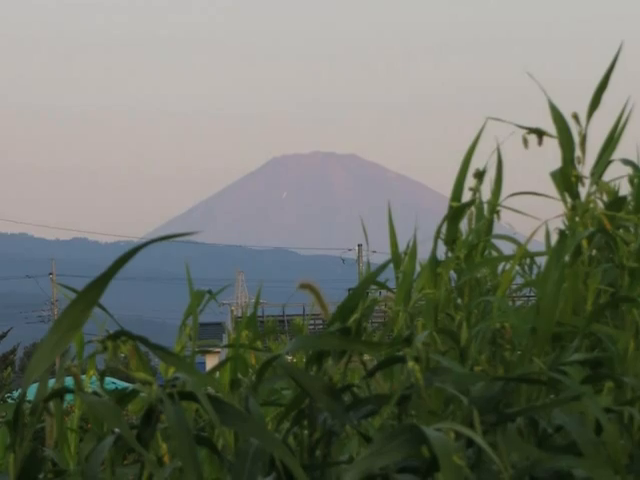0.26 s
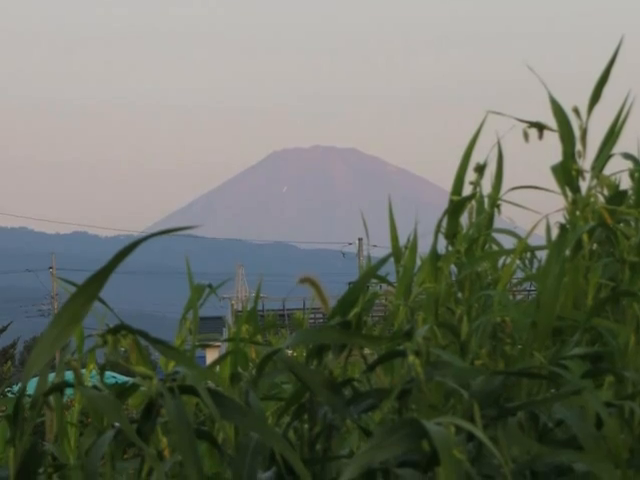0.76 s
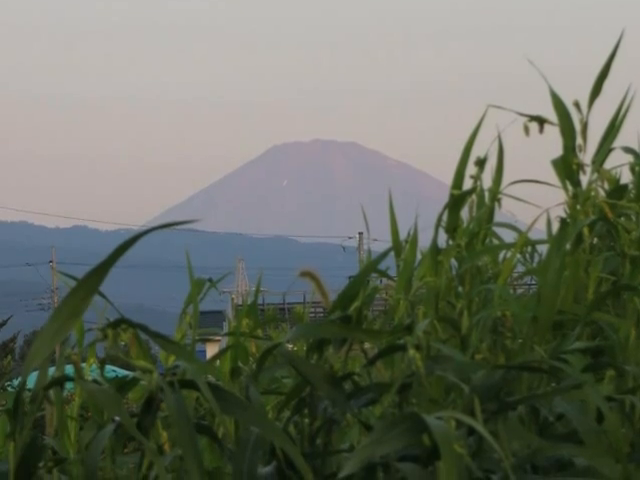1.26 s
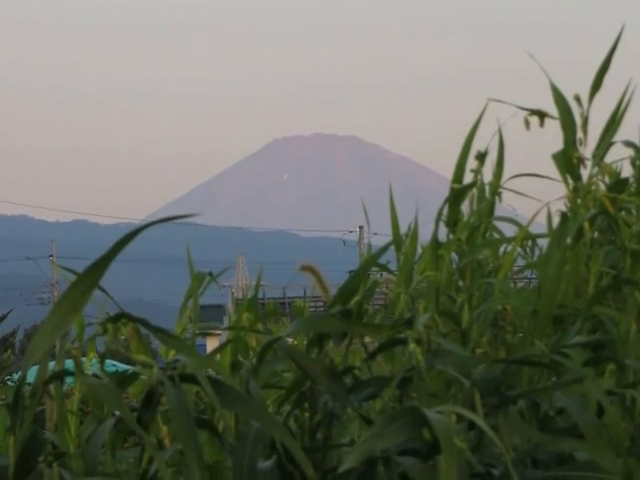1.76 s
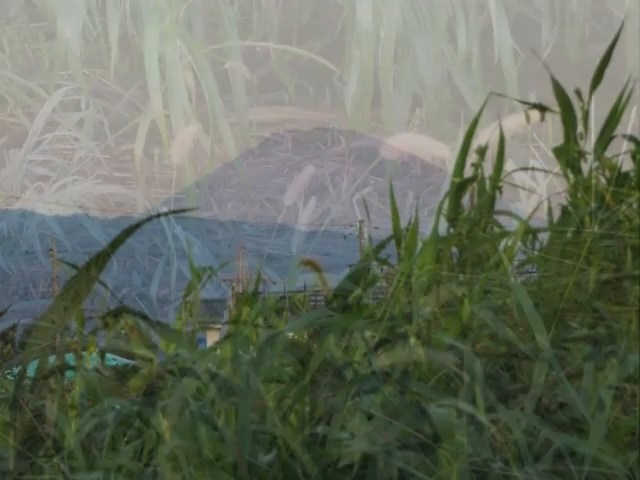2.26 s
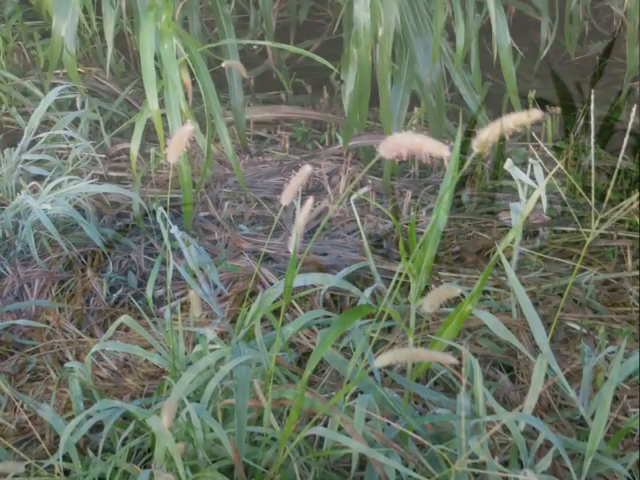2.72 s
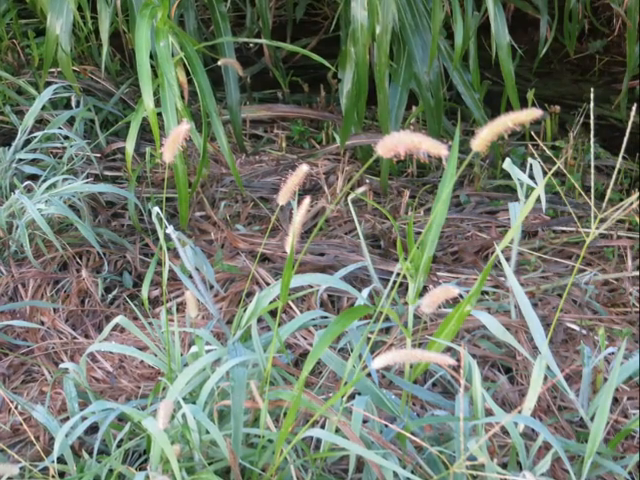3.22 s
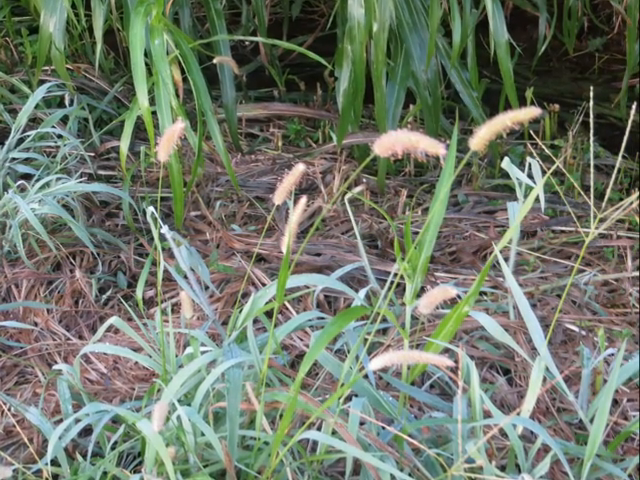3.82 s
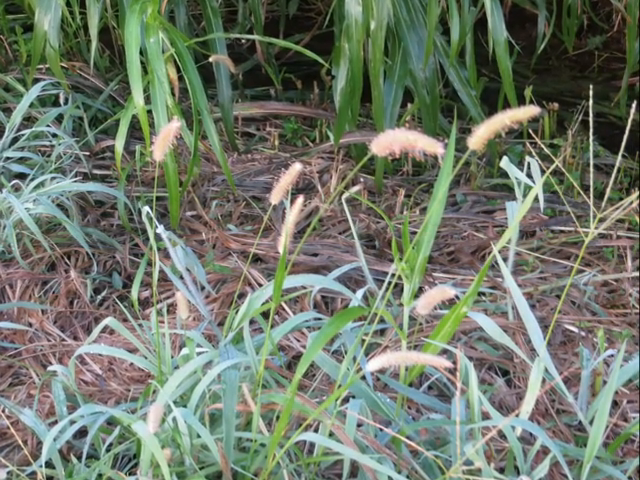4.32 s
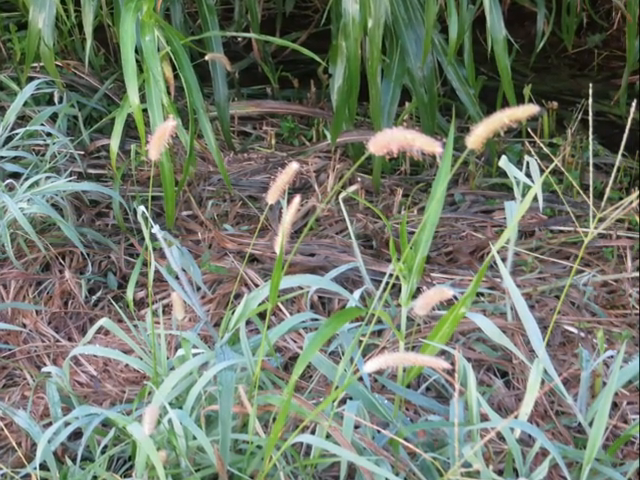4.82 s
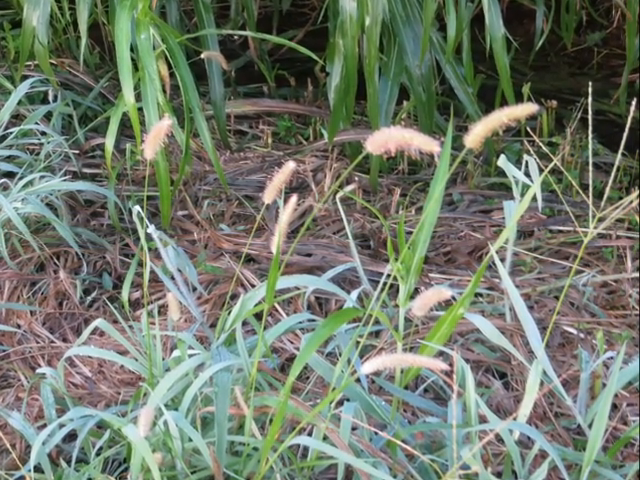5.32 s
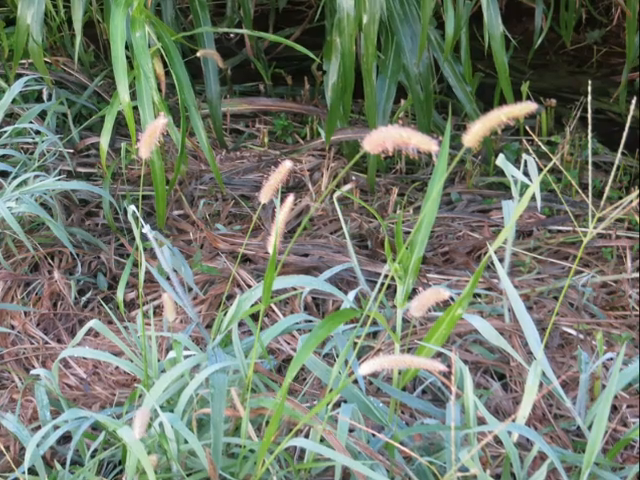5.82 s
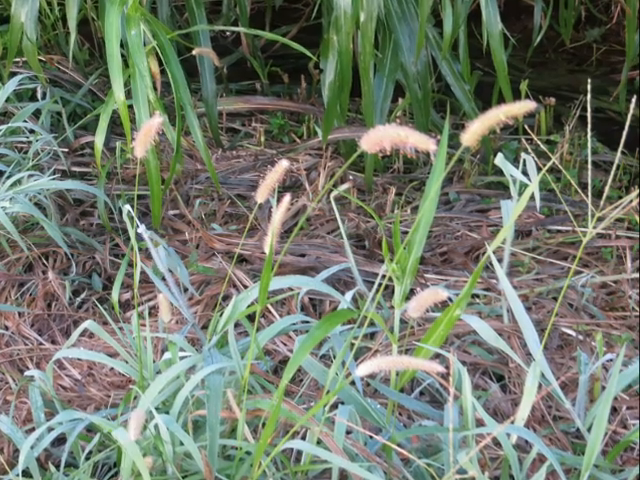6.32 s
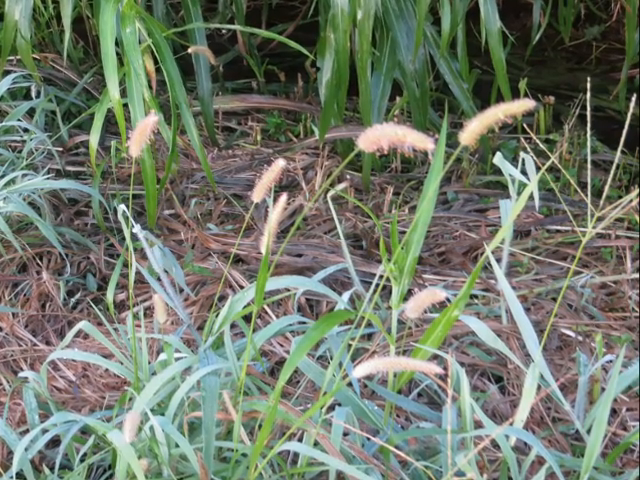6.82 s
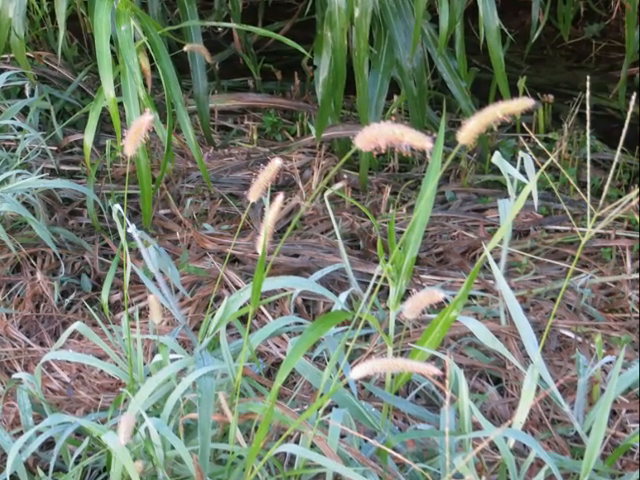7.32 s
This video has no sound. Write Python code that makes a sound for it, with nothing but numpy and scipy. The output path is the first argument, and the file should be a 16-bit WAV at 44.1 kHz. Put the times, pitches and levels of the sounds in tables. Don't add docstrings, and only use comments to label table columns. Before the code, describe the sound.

A dense field of crickets chirps and trills in two overlapping pitches over a low, steady far traffic rumble and faint hiss.

```python
import sys
import numpy as np
from scipy import signal
from scipy.fft import rfft, irfft, next_fast_len
from scipy.io import wavfile
from scipy.ndimage import uniform_filter1d, map_coordinates

SR = 44100
rng = np.random.default_rng(int(sys.argv[2]) if len(sys.argv) > 2 else 0)


def dump(signal):
    limited = np.clip(np.atleast_2d(signal).T, -1, 1)
    pcm = np.round(limited * 32767).astype(np.int16)
    wavfile.write(sys.argv[1], SR, pcm)


def invert_db(level):
    return 10 ** (np.asarray(level, dtype=float) / 20)


N = 333837

# first chirp in seconds, last chirp in seconds,
# peak level in dB.
BRIGHT_BOUTS = [
    (.135, .135, -44),
    (1.286, 1.438, -45),
    (1.584, 2.653, -44.3),
    (3.997, 5.063, -44.2),
    (5.202, 5.202, -43),
    (5.368, 5.368, -43.5),
    (6.598, 7.517, -45),
]
QUICK_BOUTS = [(.908, .908, -42), (1.067, 1.067, -41.5), (1.198, 1.198, -42.5), (1.343, 1.343, -47),
               (1.491, 1.786, -41.5), (3.27, 3.27, -43), (3.417, 3.854, -40), (4.006, 4.006, -42.5),
               (5.301, 5.591, -41), (5.733, 6.452, -40.7), (6.824, 6.824, -49)]
DEEP_BOUTS = [(.211, .211, -48.4), (.537, .537, -46.4), (.758, .758, -47.4), (1.28, 1.28, -48),
              (1.671, 1.976, -49), (2.137, 2.302, -46.5), (2.681, 2.681, -48), (3.036, 3.036, -49),
              (3.397, 3.397, -49), (4.258, 4.38, -49), (4.594, 4.594, -49.5), (4.818, 4.955, -47.5),
              (5.117, 5.278, -46), (5.456, 5.614, -47), (6.479, 6.797, -46), (6.937, 6.937, -47),
              (7.099, 7.429, -48)]
SHARP_BOUTS = [(0, 0, -42), (.245, 0.05, -47), (.427, 0.4, -48), (.882, .882, -52), (1.151, 1.25, -43.5),
               (2.085, 2, -47), (3.954, 4, -51), (4.779, 5, -49.4), (5.358, 5.5, -50), (5.42, 5.42, -50),
               (6.467, 6.5, -42), (7.056, 7, -49.7)]
# start in seconds, peak level in dB.
SLOW_CHIRPS = [(0.071, -46.5), (0.375, -45), (0.709, -48), (0.942, -54), (1.105, -54), (1.359, -47),
               (1.491, -57), (1.797, -48), (2.029, -47), (2.868, -50.5), (3.142, -49), (3.901, -48),
               (4.109, -44.5), (4.24, -43.5), (4.381, -43.5), (4.515, -41), (5.189, -43.5), (5.372, -50.6),
               (5.52, -49), (6.223, -47), (6.37, -41), (6.507, -41), (6.651, -41.5), (6.793, -40.5),
               (7.002, -50), (7.166, -48.4), (7.33, -50)]
# time in seconds, peak level in dB.
LONE_STROKES = [(.667, -52), (.813, -39.5), (2.302, -46), (3.175, -42.5), (3.252, -49), (3.7, -42),
                (2.8, -54), (2.96, -54), (2.98, -54)]
PARTNER_ALONE_S = [0.199, .35, .5, .7, .86, 1.02, 1.94, 2.4, 2.785, 3.29, 3.43, 3.58, 3.73, 3.88, 5.63]
OVERTONE_DB = dict(bright=-27.5, quick=-24.5, slow=-21.5, others=-24)

# first stroke in seconds, last stroke in seconds,
# peak level in dB.
NEAR_TRILLS = [
    (.018, .253, -40),
    (.552, .552, -43),
    (4.352, 4.352, -44),
    (4.434, 4.587, -40),
    (4.669, 4.918, -39.5),
]
NEAR_GROUPS = [(.391, .487, -42), (.679, .78, -42), (.893, .944, -42), (1.073, 1.118, -42.6),
               (1.277, 1.327, -44), (1.473, 1.529, -44.5), (3.565, 3.565, -49), (3.888, 3.888, -46),
               (4.01, 4.054, -48.5), (4.276, 4.276, -49), (5.035, 5.084, -41.5), (5.141, 5.195, -41.6),
               (5.322, 5.372, -42), (5.493, 5.543, -41.5), (5.68, 5.727, -42.5), (5.855, 5.911, -43),
               (7.1, 7.207, -51), (7.359, 7.359, -47), (7.52, 7.52, -48)]
RIVAL_TRILLS = [
    (3.123, 3.123, -46.5),
    (3.198, 3.348, -43.5),
    (6.708, 7.005, -43),
]
FAR_TRILLS = [(.329, .402, -48.5), (.373, .373, -50), (.539, .612, -48), (1.047, 1.207, -52),
              (1.303, 1.384, -55), (1.633, 1.633, -52), (1.786, 1.935, -52.5), (2.121, 2.121, -50),
              (2.271, 2.271, -51), (2.569, 2.569, -50), (3.044, 3.044, -52), (4.322, 4.603, -47.5),
              (4.735, 4.9, -47), (5.051, 5.13, -51), (5.28, 5.28, -52), (5.4, 5.4, -53), (5.605, 5.84, -52),
              (6.012, 6.099, -52), (6.344, 6.344, -47), (6.499, 6.573, -50), (6.658, 6.887, -46.5),
              (7.046, 7.046, -49), (7.27, 7.27, -49), (7.471, 7.471, -50.5)]

# start in seconds, peak level in dB.
HIGH_LONG = [(.558, -48.5), (1.273, -49)]
HIGH_NEAR = [(2.015, -49), (2.875, -48), (3.752, -49), (4.374, -48.5), (5.396, -50.5), (6.340, -49.5),
             (7.315, -48.5)]
HIGH_FAR = [(.782, -58), (2.094, -58), (3.454, -57), (4.643, -57.5), (5.887, -58), (6.354, -59),
            (7.238, -57.5)]
BUZZER = [(4.82, -52), (5.546, -51.5), (6.938, -51.5)]
THIN = [(.049, -58), (1.576, -57), (2.965, -56.5), (4.522, -57.5), (5.970, -57), (7.422, -56)]

# pitch in Hz, spread in Hz, glide in Hz/s, stroke in seconds,
# strokes per second, rms level in dB.
CROWD = [
    (3713, 123, -12000, 0.03, 190, -58),
    (4830, 190, -80000, 0.0093, 140, -62.5),
    (6450, 150, -80000, 0.022, 250, -73.5),
    (7424, 160, -30000, 0.0068, 380, -72),
]
# time in seconds, peak level in dB, pitch in Hz, t60 in seconds.
TICKS = [
    (.305, -45, 2200, 0.022),
    (.44, -44, 2250, 0.018),
    (1.394, -40.5, 708, 0.042),
    (1.469, -39, 1420, .012),
    (3.054, -43, 523, .07),
    (3.317, -40, 2200, 0.008),
    (4.392, -42.5, 893, .06),
    (6.488, -42, 2500, .008),
]
# time in seconds, peak level in dB, pitch in Hz, length in seconds, glide in Hz/s.
BIRD = (4.277, -55, 5400, 0.1, 20000)

# time in seconds, rms level in dB.
HUM_DB = [
    (0, -57.5),
    (1.3, -59),
    (2.6, -67.5),
    (7.57, -69),
]
# time in seconds, rms level in dB.
RUMBLE_DB = [
    (0.0, -42.5),
    (5.57, -41.5),
    (7.57, -43),
]
# frequency in Hz, density in dB per Hz.
RUMBLE_SPECTRUM = [(12, -61), (20, -7.5), (49, 2.5), (119, -6.5), (146, -6), (203, -11.5), (231, -17.5),
                   (259, -18.5), (420, -31), (550, -62), (920, -120)]
# frequency in Hz, density in dB per Hz.
AIR_SPECTRUM = [(300, -5.5), (500, 0.5), (1000, -4), (2000, -8.5), (3000, -12.5), (4300, -1.5), (6000, -13),
                (8500, -16.5), (11000, -15.5)]

CHIRP_PACE_S, TRILL_PACE_S, GROUP_PACE_S = .15, .078, .051


def field_crickets():
    quick_rows = bouts(QUICK_BOUTS, CHIRP_PACE_S)
    bright = chirps(bouts(BRIGHT_BOUTS, CHIRP_PACE_S), 5050, .0158, .0165, -88000, count=4,
                    bend=.7, overtone_db=OVERTONE_DB["bright"])
    quick = chirps(quick_rows, 4740, .0143, .011, -80000, count=4, first_db=-1.5,
                   rise=.6, overtone_db=OVERTONE_DB["quick"])
    slow = chirps(SLOW_CHIRPS, 4700, .0165, .012, -70000, count=3, first_db=-1.5,
                  overtone_db=OVERTONE_DB["slow"])
    wing = dict(length_s=.012, glide_hz_s=-90000, overtone_db=OVERTONE_DB["others"])
    deep = chirps(bouts(DEEP_BOUTS, CHIRP_PACE_S), 4750, .0158, count=4, **wing)
    sharp = chirps(bouts(SHARP_BOUTS, CHIRP_PACE_S), 5000, .0156, count=3, **wing)
    shadow = chirps(quick_rows + [.0135, -7, 0], 4926, .0155, count=3, **wing)
    lone = chirps(LONE_STROKES, 4650, 0, .011, -90000, count=1, rise=.6, overtone_db=OVERTONE_DB["quick"])
    return bright + quick + slow + lone + invert_db(-1.0) * (deep + sharp + shadow)


def partner():
    lead_s = .028
    leading = bouts(BRIGHT_BOUTS, CHIRP_PACE_S)[:, 0] - lead_s
    starts = np.concatenate([leading, PARTNER_ALONE_S])
    rows = np.transpose([starts, np.full(len(starts), -52.)])
    song = chirps(rows, 5020, .0152, .012, -90000, count=6)
    return song + invert_db(-4.0) * grass(song)


def low_crickets():
    wing = dict(glide_hz_s=-11000, rise=.7, fall=.7, bend=.2, overtone_db=-38)
    s, db, _ = bouts(NEAR_TRILLS, TRILL_PACE_S).T
    near = strokes(s + .003, db, 3515, .056, **wing)
    s, db, place = bouts(NEAR_GROUPS, GROUP_PACE_S).T
    opening = place == 0
    length_s = np.where(opening, .035, .048)
    near += strokes(s + .002, db - 1 * opening, 3520, length_s, **wing)
    s, db, _ = bouts(RIVAL_TRILLS, TRILL_PACE_S).T
    rival = strokes(s, db, 3620, .057, glide_hz_s=-12000, rise=1.0, fall=.5, overtone_db=-30)
    s, db, _ = bouts(FAR_TRILLS, TRILL_PACE_S).T
    luck = rng.standard_normal((len(s), 2))
    far_db = db + 1.2 * luck[:, 0]
    far_hz = 3785 + 30 * luck[:, 1]
    far = strokes(s + .002, far_db, far_hz, .032, glide_hz_s=-13000, rise=.84, fall=.65, overtone_db=-28)
    return invert_db(-1.6) * near + rival + far


def high_crickets():
    wing = dict(hz=6400, period_s=.0283, length_s=.016, glide_hz_s=-80000, first_db=-6)
    near = chirps(HIGH_LONG, count=6, **wing) + chirps(HIGH_NEAR, count=5, **wing)
    far = chirps(HIGH_FAR, hz=6600, period_s=.0283, length_s=.013, glide_hz_s=-80000, count=5)
    far = far + invert_db(0.5) * np.roll(far, 330)
    flutter = 1 + .61 * np.sin(2 * np.pi * 170 * np.arange(N) / SR + 2 * wobble(40))
    wing = dict(period_s=.0234, length_s=.021, glide_hz_s=-22000, count=5)
    buzz = chirps(BUZZER, hz=7270, **wing)
    buzz = buzz + invert_db(-15) * chirps(BUZZER, hz=6700, **wing)
    thin = chirps(THIN, hz=7550, period_s=.026, length_s=.014, glide_hz_s=-40000, count=5, first_db=-3)
    return near + far + flutter * buzz + thin


def strokes(s, db, hz, length_s, glide_hz_s, rise=.86, fall=.38, bend=0., overtone_db=-30):
    s, db, hz, length_s = (v[:, None] for v in np.broadcast_arrays(s, db, hz, length_s))
    longest = length_s.max() * SR
    t = (np.arange(int(1.2 * longest)) - .65 * longest) / SR
    u = 2 * t / length_s + .12
    edge = np.clip(np.minimum((1 + u) / rise, (1 - u) / fall), 0, 1)
    envelope = np.sin(np.pi / 2 * edge) ** 2
    turn = hz * t + glide_hz_s * t ** 2 / 2 - bend * glide_hz_s * t ** 3 / (3 * length_s)
    turn = turn + rng.random(s.shape)
    wing = np.sin(2 * np.pi * turn) + invert_db(overtone_db) * np.sin(4 * np.pi * turn)
    sound = invert_db(db) * envelope * wing
    at = np.round((s + t[0]) * SR).astype(int) + np.arange(len(t)) + 1
    at = np.clip(at, 0, N + 1)
    return np.bincount(at.ravel(), sound.ravel(), N + 2)[1:N + 1]


def chirps(rows, hz, period_s, length_s, glide_hz_s, count, first_db=0., **shape):
    s, db = np.transpose(rows)[:2, :, None]
    k = np.arange(count)
    luck = rng.standard_normal((len(s), count, 2))
    db = db + first_db * (k == 0) + 1.38 * luck[..., 0]
    pitch_hz = hz * (1 + .005 * luck[..., 1])
    times = s + k * period_s
    return strokes(times.ravel(), db.ravel(), pitch_hz.ravel(), length_s, glide_hz_s, **shape)


def bouts(rows, pace_s):
    out = []
    for first, last, db in rows:
        times = np.linspace(first, last, round((last - first) / pace_s) + 1)
        out += [(s, db, k) for k, s in enumerate(times)]
    return np.array(out)


def grass(x):
    t60_s, gap_s = .044, .002
    t = np.arange(SR // 5) / SR
    tail = rng.standard_normal(len(t)) * invert_db(-60 * t / t60_s) * (t > gap_s)
    return signal.fftconvolve(x, tail / np.linalg.norm(tail))[:N]


def crowd():
    total = np.zeros(N)
    for pitch_hz, spread_hz, glide_hz_s, length_s, rate, rms_db in CROWD:
        luck = rng.random((3200, 3))
        s = np.cumsum(2 * luck[:, 0]) / rate
        inside = s < N / SR
        s, luck = s[inside], luck[inside]
        hz = pitch_hz + spread_hz * 3.05 * (luck[:, 2] - .5)
        group = strokes(s, 12 * luck[:, 1], hz, length_s, glide_hz_s)
        total += invert_db(rms_db + 1.4 * wobble(2.8)) * unit(group)
    return total


def ticks():
    crack_db, crack_t60_s = -2, .006
    out = np.zeros(N + SR)
    t = np.arange(SR // 8) / SR
    for s, db, pitch_hz, t60_s in TICKS:
        ring = invert_db(-60 * t / t60_s) * np.sin(2 * np.pi * pitch_hz * t) * (1 - np.exp(-8 * t / t60_s))
        noise = uniform_filter1d(rng.standard_normal(len(t)), size=7)
        crack = invert_db(crack_db - 60 * t / crack_t60_s) * noise * (t60_s < .03)
        out[round(s * SR):][:len(t)] += invert_db(db) * (ring + crack)
    return out[:N]


def bird():
    s, db, pitch_hz, length_s, glide_hz_s = BIRD
    return strokes([s], db, pitch_hz, length_s, glide_hz_s)


def vehicle_hum():
    hum = unit(filtered(rng.standard_normal(N), lambda hz: 1 / (1 + ((hz - 290) / 60) ** 4)))
    return hum * invert_db(np.interp(np.arange(N) / SR, *np.transpose(HUM_DB)))


def traffic_rumble():
    rumble = unit(filtered(rng.standard_normal(N), lambda hz: invert_db(along(RUMBLE_SPECTRUM, hz))))
    return rumble * invert_db(np.interp(np.arange(N) / SR, *np.transpose(RUMBLE_DB)))


def air_hiss():
    air = unit(filtered(rng.standard_normal(N), lambda hz: invert_db(along(AIR_SPECTRUM, hz)) * (hz > 200)))
    flicker_db = .6 * wobble(8) + .6 * wobble(40)
    return invert_db(-57.5 + flicker_db) * air


def along(points, hz):
    f, v = np.transpose(points)
    return np.interp(np.log(hz + 1), np.log(f + 1), v)


def filtered(x, response):
    m = next_fast_len(N + 8192)
    return irfft(rfft(x, m) * response(np.fft.rfftfreq(m, 1 / SR)), m)[:N]


def unit(x):
    return x / np.sqrt(np.mean(x ** 2))


def wobble(rate_hz):
    knots = rng.standard_normal(int(N * rate_hz / SR) + 4)
    return map_coordinates(knots, [np.arange(N) * rate_hz / SR])


def scene():
    songs = field_crickets() + low_crickets() + high_crickets()
    near = invert_db(0.54) * songs + invert_db(-9) * grass(songs) + partner()
    background = vehicle_hum() + traffic_rumble() + air_hiss()
    return (near + crowd() + ticks() + bird() + background)[None]


def drop_weak_cells(x):
    hz, t, z = signal.stft(x, SR / 2, nperseg=768)
    busy = np.sqrt(uniform_filter1d(np.mean(np.abs(z[205:280]) ** 2, 0), size=3))
    drift_db = 2 * wobble(5)[np.minimum((t * SR).astype(int), N - 1)]
    usual = np.median(np.abs(z[350:])) * (busy / np.median(busy)) ** .4
    tilt_db = 2.8 * (hz[:, None] - 10600) / 1000
    limit = usual * invert_db(2 + drift_db + tilt_db)
    return signal.istft(z * (np.abs(z) > limit), SR / 2, nperseg=768)[1][:len(x)]


def low_pass(x):
    return signal.sosfilt(signal.butter(12, 16810, fs=SR, output="sos"), x)


def record(dry):
    slow = filtered(dry[0], lambda hz: 1 / (1 + (hz / 11000) ** 24))[::2]
    held = np.repeat(drop_weak_cells(slow), 2)[:N]
    held = filtered(held, lambda hz: 1 / (1 + (hz / 15500) ** 300))
    return low_pass(held[None])


dry = scene()
out = record(dry)
dump(out)
```